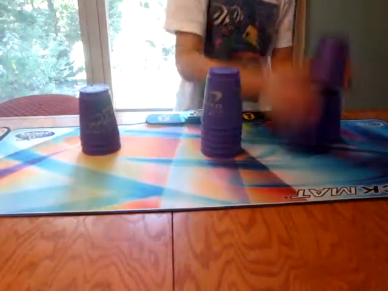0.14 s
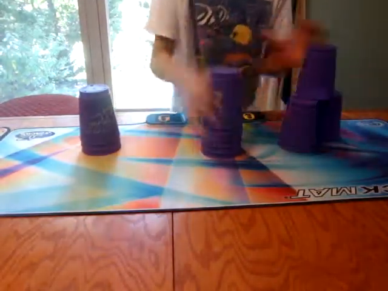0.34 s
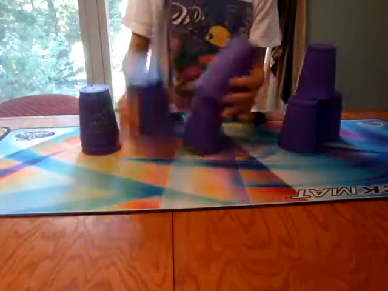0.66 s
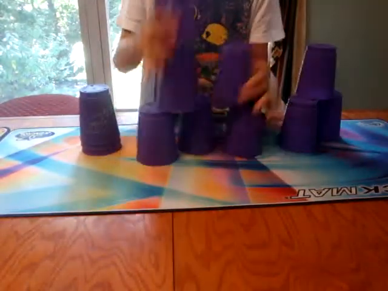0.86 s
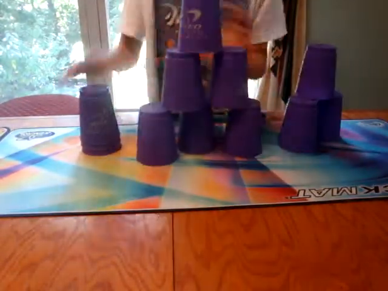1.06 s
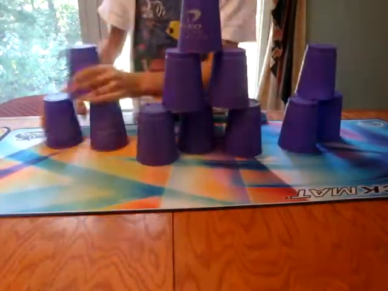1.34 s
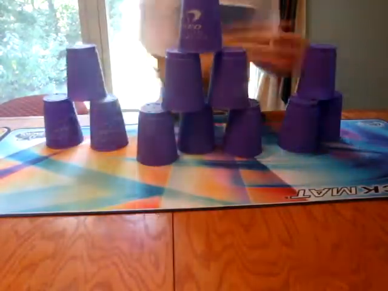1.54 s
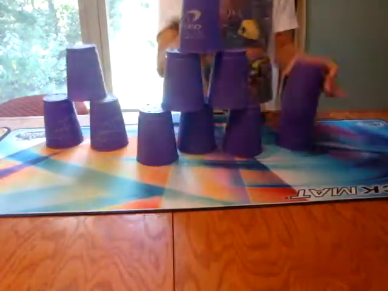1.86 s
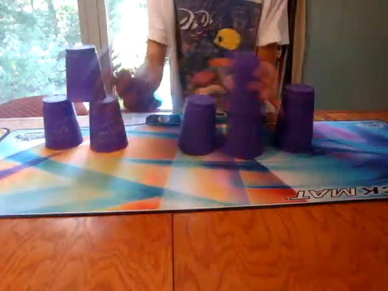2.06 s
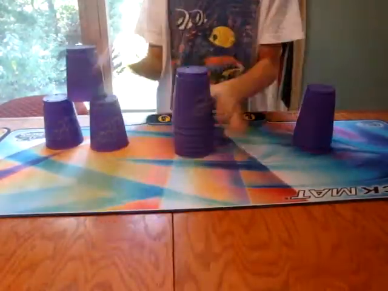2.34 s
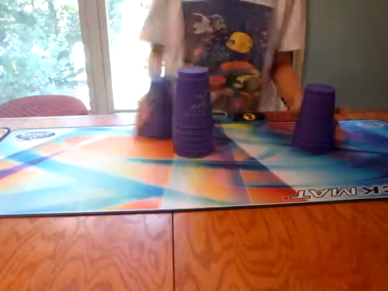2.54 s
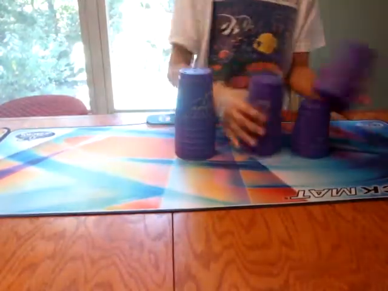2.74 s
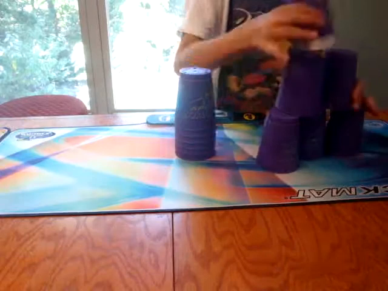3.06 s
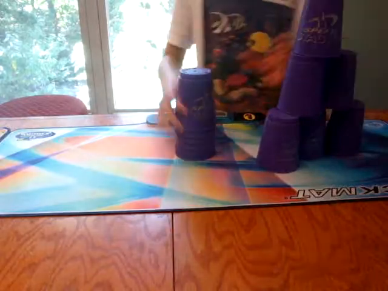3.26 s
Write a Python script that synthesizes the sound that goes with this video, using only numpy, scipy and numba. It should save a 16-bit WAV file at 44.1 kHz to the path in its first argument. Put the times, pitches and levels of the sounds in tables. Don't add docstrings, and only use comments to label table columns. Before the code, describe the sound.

Fast hollow clacking of plastic cups being stacked, nested and restacked in a bare room.

```python
import sys
import numpy as np
from scipy import signal
from scipy.fft import rfft, irfft
from scipy.io import wavfile
from scipy.ndimage import uniform_filter1d, minimum_filter1d
from numba import njit

SR = 44100
rng = np.random.default_rng(int(sys.argv[2]) if len(sys.argv) > 2 else 0)


def convert_level_to_amplitude(level_db):
    exponent = np.asarray(level_db, float) / 20
    return 10 ** exponent


def pcm_store(signal):
    levels = np.round(np.clip(np.atleast_2d(signal), -1, 1) * 32767)
    wavfile.write(sys.argv[1], SR, levels.astype(np.int16).T)


N = 149940

# [t/s, level/dB, cup pitch f/Hz, crack level/dB relative to the knock]
FIRST_STACKS = [(0.034, -20, 535, -23), (0.118, -22, 444, -10.5), (0.218, 8, 779, -18.5),
                (0.231, 7, 573, -16), (0.249, 3, 893, -12), (0.269, 3, 920, -21.5), (0.311, -5, 968, -66),
                (0.368, -10, 906, -23.5), (0.416, -20.5, 960, -6.5), (0.541, -10, 840, -15.5),
                (0.547, -7, 1495, -19.5), (0.66, -26, 700, 3.5), (0.688, -3, 603, -10),
                (0.694, -4.5, 682, -18), (0.719, -4, 873, -31), (0.741, -6, 749, -24),
                (0.806, -13, 601, -19.5), (0.825, -13, 540, -8.5)]
LAST_STACKS = [(0.865, -3.5, 980, -21), (0.914, 4, 871, -16.5), (0.979, -5.5, 872, -6.5),
               (0.987, 4.5, 1026, -31.5), (1.004, -4, 930, -45), (1.039, -11.5, 990, -22),
               (1.244, -5, 1840, -20), (1.365, 0.5, 779, -20), (1.374, -2.5, 1002, -14),
               (1.385, 3, 839, -13), (1.655, -7.5, 847, -20), (1.676, -5.5, 953, -23),
               (1.691, -8, 755, -14)]
NESTING = [(1.791, -9, 946, -8), (1.808, -8, 960, -21.5), (1.827, -10.5, 967, -10),
           (1.852, -10, 886, -10.5), (1.883, -11.5, 905, -8), (1.91, -10, 1056, -10),
           (1.926, -5, 848, -20.5), (1.937, -5.5, 970, -17), (1.948, -11, 997, -4.5),
           (1.969, -10.5, 800, -5), (1.983, 0.5, 1653, -19), (2.002, -8, 1490, -12.5),
           (2.027, 0, 1364, -17), (2.044, -4, 1266, -30), (2.084, -14, 950, -27.5), (2.102, -17, 896, -3),
           (2.13, -17.5, 895, -5), (2.155, 2, 1737, -20.5), (2.212, -16.5, 817, -4.5), (2.224, -15, 643, 0),
           (2.239, -14.5, 660, -6.5), (2.263, -16, 792, -21.5), (2.302, -20, 627, -5),
           (2.312, -4, 2025, -19), (2.381, -11.5, 920, -16), (2.398, -4, 948, -23),
           (2.437, -14, 967, -13.5)]
RESTART = [(2.54, -9, 809, -1), (2.576, -6.5, 1750, -11), (2.589, -5.5, 1185, -20),
           (2.777, -21.5, 573, -27), (2.804, -20, 632, -16.5), (2.84, -9, 786, -16),
           (2.917, -13.5, 620, -14), (2.963, -9.5, 773, -17.5), (2.984, -7.5, 1178, -31.5),
           (3.037, -3.5, 867, -11.5), (3.054, -3, 950, -36.5), (3.099, -4, 833, -11.5),
           (3.136, -10, 844, -32.5)]
# [t/s, level/dB, cup pitch f/Hz, crack level/dB
MORE_KNOCKS = [(.064, -22.5, 820, -36), (0.209, -16, 674, -14), (.527, -16.5, 1945, -18.5),
               (.884, -2, 960, -22.5), (.940, -9.5, 850, -13.5), (1.405, -4, 1005, -29.5),
               (2.186, -13.5, 734, -12), (2.558, -9.5, 1160, -13), (3.019, -13.5, 1013, -28),
               (3.079, -9.5, 965, -17.5), (3.11, -5, 1195, -19)]
# [ratio to cup pitch, level/dB, cycles to fade by 60 dB]
WALL_MODES = [(1, 1, 30), (1.33, -10.5, 30.5), (0.777, -11.5, 22.5)]
# [f/Hz, width/Hz, level/dB, 60 dB fade/s]
CRACK_BANDS = [(962, 1005, -0.5, 0.039), (2284, 1245, 1, 0.028), (3760, 1200, -12, 0.04),
               (5200, 1800, 0.5, 0.01), (7800, 2260, -6.5, 0.012)]
# [f/Hz, level/dB]
STANDING_CUPS = [(560, -7.5), (650, -6), (760, -11.5), (935, -7.5), (985, -9.5), (1192, -8), (1280, -14.5),
                 (1370, -9.5)]
# [t/s, level/dB]
FREEDOM = [
    (0.199, -6.5),
    (.3, -20.5),
    (0.449, -7),
    (.95, -19.5),
    (1.7, -26),
    (2.3, -13.5),
    (3.1, -14.5),
]
# [f/Hz, level/dB, 60 dB fade/s]
TABLE_MODES = [(177.5, -34, 0.05), (338, -35, 0.41), (407, -43.5, 0.42)]
# [f/Hz, level/dB, 60 dB fade/s]
ROOM_BANDS = [(300, -1.5, 0.15), (632, -7, 0.39), (1106, -8, 0.48), (2046, -7.5, 0.43), (4440, -8, 0.42),
              (8000, -12.5, 0.44)]
# [f/Hz, level/dB per Hz]
AIR_COLOUR = [(30, -8.5), (180, -1.5), (500, -1), (1300, -3.5), (10000, -22)]
# [t/s, level/dB, f/Hz]
POPS = [(0.041, -13, 550), (0.245, 6, 677), (0.274, -12, 930), (0.318, -6, 1210), (0.348, -6, 944),
        (0.712, -8, 730), (0.832, -14.5, 564), (0.873, -17, 1010), (0.901, -10, 640), (0.918, -12, 806),
        (0.931, -8, 855), (1.035, -16, 1154), (1.059, -10.5, 930), (1.419, -14, 930), (1.856, -24.5, 1060),
        (1.866, -9, 930), (2.158, -8, 787), (3.129, -6, 950)]
# [t/s, level/dB, f/Hz]
TICKS = [(0.229, -19.5, 2390), (0.239, -23, 2190), (0.245, -3.5, 1960), (0.256, -8, 2240),
         (0.28, -45, 2130), (0.293, -34.5, 1820), (0.709, -14.5, 1715), (0.773, -24, 2490),
         (0.873, -33, 2290), (0.996, -29.5, 1610), (1.252, -20, 1694), (1.259, -17.5, 1740),
         (1.414, -23.5, 2400), (1.649, -23, 2500), (1.696, -16.5, 5220), (1.801, -23, 2540),
         (1.856, -13, 3140), (1.873, -24, 2700), (1.903, -24, 2580), (1.913, -18, 2940),
         (1.963, -17.5, 2370), (1.977, -14.5, 2910), (1.991, -14.5, 1650), (1.998, -26, 1730),
         (2.009, -13.5, 2000), (2.015, -16.5, 1770), (2.049, -35.5, 1550), (2.14, -15, 2810),
         (2.145, -17, 3080), (2.161, -22.5, 1880), (2.174, -24, 1730), (2.204, -30, 2010),
         (2.244, -15.5, 2330), (2.327, -21.5, 2210), (2.376, -37, 2700), (2.406, -9.5, 4930),
         (2.547, -10.5, 2900), (2.567, -18, 2950), (2.584, -15, 1980), (2.607, -27, 1580),
         (2.622, -23.5, 1880), (2.927, -29, 2360)]
# [t/s, level/dB, f/Hz]
MORE_TICKS = [
    (.586, -33.5, 3060),
    (1.756, -34, 3000),
    (3.31, -36, 6120),
    (3.347, -38.5, 934),
    (3.384, -33, 5130),
    (3.38, -35.5, 660),
]
# [t/s, level/dB, f/Hz, 60 dB fade/s]
LONE_RINGS = [(0.225, -10, 187, 0.093), (0.268, -1.5, 921.6, 0.28), (.326, -7, 938, 0.15),
              (.3, -13.5, 1287, 0.23), (0.419, -33.5, 128, 0.29), (0.549, -17, 1181, 0.14),
              (0.868, -9, 1075, 0.27), (.98, -22.5, 949, 0.44), (1.252, -27.5, 1774, 0.14),
              (1.252, -25, 1947, .16), (1.246, -30, 650, 0.067), (1.248, -20.5, 1187, 0.12),
              (3.105, -14, 1091, 0.24)]
# [f/Hz, threshold level/dB relative to the highest level nearby]
THINNING = [(1500, -17), (4500, -14.5), (5500, -12), (10000, -7.5)]


def band(x, hz, width):
    edges = [max(hz - width / 2, 20), hz + width / 2]
    return signal.sosfilt(signal.butter(2, edges, "band", fs=SR, output="sos"), x)


def fade(t, t60):
    return convert_level_to_amplitude(-60 * t / max(t60, .002))


def air():
    level_db, earlier_db, earlier_t60_s = -46, 8, 1
    f = np.arange(N // 2 + 1) * SR / N + 1
    hz, db = np.array(AIR_COLOUR).T
    colour = convert_level_to_amplitude(np.interp(np.log(f), np.log(hz), db))
    x = irfft(rfft(rng.standard_normal(N)) * colour, N)
    earlier = convert_level_to_amplitude(earlier_db) * fade(np.arange(N) / SR, earlier_t60_s)
    return x / x.std() * convert_level_to_amplitude(level_db) * (1 + earlier)


def knock(rows):
    crack_gain_db, spread_db, detune = 14, 5, 0.09
    contact_s, soften = 0.00093, 0.22
    stiff_hz = 1130
    size = 4096
    out, blows, t = np.zeros(N + size), np.zeros(N), np.arange(size) / SR
    crack_env = np.zeros((len(CRACK_BANDS), N + size))
    luck = rng.standard_normal((len(rows), 3, 8))
    fades = np.array([fade(t, t60) for _, _, _, t60 in CRACK_BANDS])
    for (s, db, hz, crack_db), (level_luck, pitch_luck, crack_luck) in zip(rows, luck):
        i = int(s * SR)
        touch = np.minimum(t / contact_s * convert_level_to_amplitude(soften * db), 1)
        for k, (ratio, wall_db, cycles) in enumerate(WALL_MODES):
            loose = min(k, 1)
            level = convert_level_to_amplitude(db + wall_db + spread_db * loose * level_luck[k])
            t60 = cycles / hz * min(1, stiff_hz / hz)
            mode_hz = hz * ratio * (1 + detune * loose * pitch_luck[k])
            out[i:i + size] += level * fade(t, t60) * touch * np.sin(2 * np.pi * mode_hz * t)
        level = convert_level_to_amplitude(db + crack_db + crack_gain_db + 2 * crack_luck[:len(CRACK_BANDS), None])
        crack_env[:, i:i + size] += level * fades * np.sqrt(touch)
        blows[i:i + 24] += convert_level_to_amplitude(db) * np.hanning(24) / 12
    for env, (hz, width, db, _) in zip(crack_env, CRACK_BANDS):
        out += convert_level_to_amplitude(db) * band(env * rng.standard_normal(len(env)), hz, width)
    return out[:N], blows


@njit
def ring(x, hz, t60):
    y, z, r = np.empty(len(x)), 0j, np.exp(-np.log(1000.) / t60 / SR)
    for i in range(len(x)):
        if i % 64 == 0:
            p = r * np.exp(2j * np.pi * hz[i] / SR)
        z = z * p + x[i] + 1e-18
        y[i] = z.imag
    return y


def wander(hz, share):
    steps = np.repeat(rng.standard_normal(N // 32 + 1), 32)
    return hz * (1 + share * 6 * uniform_filter1d(steps, size=1200)[:N])


def standing_cups(blows):
    t60_s, wobble = 0.22, 0.014
    shaken = blows * convert_level_to_amplitude(np.interp(np.arange(N) / SR, *np.array(FREEDOM).T))
    return sum(convert_level_to_amplitude(db) * ring(shaken, wander(hz, wobble), t60_s) for hz, db in STANDING_CUPS)


def table_top(blows):
    thump = (60, -38, 0.1)  # f/Hz, level/dB, 60 dB fade/s
    modes = list(TABLE_MODES) + [thump]
    return sum(convert_level_to_amplitude(db) * ring(blows, np.full(N, 1. * hz), 1. * t60) for hz, db, t60 in modes)


def rattle(rows):
    bounces, lag_s, sag_db_s = 5, 0.022, 121
    gain_db, scatter_db, hiss_db = -21, 6, 8
    middle_hz, octaves, t60_s = 1338, 1.066, 0.021
    r = rng.random((len(rows), bounces, 3))
    out, t = np.zeros(2 * N), np.arange(1024) / SR
    env, hiss = fade(t, t60_s), band(rng.standard_normal(2 * N), 4580, 3900)
    for (s, db, _, crack_db), row in zip(rows, r):
        for chance, size, pitch in row:
            lag = -lag_s * np.log(chance)
            i = int((s + lag) * SR)
            hz = middle_hz * 2 ** (octaves * (2 * pitch - 1))
            level_db = db + crack_db / 2 + gain_db + scatter_db * 2 * size - sag_db_s * lag
            scrape = convert_level_to_amplitude(crack_db / 2 + hiss_db) * hiss[i:i + 1024]
            out[i:i + 1024] += convert_level_to_amplitude(level_db) * env * (np.sin(2 * np.pi * hz * t) + scrape)
    return out[:N]


def room(x):
    echo_s, build_s = 0.0025, 0.0072
    t = np.arange(30000) / SR
    build = np.clip((t - echo_s) / build_s, 0, 1)
    tail = 0
    for hz, db, t60 in ROOM_BANDS:
        part = band(rng.standard_normal(30000), hz, 0.8 * hz) * fade(t, t60) * build
        tail = tail + convert_level_to_amplitude(db) * part / np.sqrt(t60 * SR / 14)
    return signal.fftconvolve(x, tail)[:N]


def small_rings(rows, gain_db, rise_s, cycles, hiss_db):
    hiss_t60_s = 0.0095
    out, t = np.zeros(2 * N), np.arange(2048) / SR
    hiss = band(rng.standard_normal(2 * N), 4000, 8700)
    luck = rng.standard_normal((len(rows), 2))
    for (s, db, hz), (a, b) in zip(rows, luck):
        i = int(s * SR)
        second = np.sin(2 * np.pi * hz * (1.2 + 0.098 * a) * t + b)
        tone = (np.sin(2 * np.pi * hz * t) + 0.43 * second) * fade(t, cycles / hz)
        scrape = convert_level_to_amplitude(hiss_db) * hiss[i:i + 2048] * fade(t, hiss_t60_s)
        out[i:i + 2048] += convert_level_to_amplitude(db + gain_db) * np.minimum(t / rise_s, 1) * (tone + scrape)
    return out[:N]


def lone_rings():
    beat, twin_db, swell_s = 0.024, -8.5, 0.0014
    size = 20000
    out, t = np.zeros(N + size), np.arange(size) / SR
    swell = np.minimum(t / swell_s, 1)
    for s, db, hz, t60 in LONE_RINGS:
        i = int(s * SR)
        twin = convert_level_to_amplitude(twin_db) * np.sin(2 * np.pi * hz * (1 + beat) * t)
        out[i:i + size] += convert_level_to_amplitude(db) * fade(t, t60) * swell * (np.sin(2 * np.pi * hz * t) + twin)
    return out[:N]


def scene():
    room_tone = air()
    rows = [row for burst in (FIRST_STACKS, LAST_STACKS, NESTING, RESTART, MORE_KNOCKS) for row in burst]
    cups, blows = knock(rows)
    dry = convert_level_to_amplitude(-3) * (cups + standing_cups(blows) + table_top(blows) + lone_rings())
    dry = dry + rattle(rows)
    dry = dry + small_rings(POPS, gain_db=3.5, rise_s=0.0026, cycles=17, hiss_db=-28)
    rims = list(TICKS) + list(MORE_TICKS)
    dry = dry + small_rings(rims, gain_db=5, rise_s=0.00081, cycles=23, hiss_db=-7)
    return (dry + room(dry) + room_tone)[None]


@njit
def follow(x, fall):
    y, e = np.empty(len(x)), 0.
    for i in range(len(x)):
        e = max(x[i], e * fall)
        y[i] = e
    return y


def limiter(x):
    limit_db, release_s = -3.5, 0.011
    peak = follow(np.abs(np.roll(x, -20)), np.exp(-1 / (release_s * SR)))
    return x * uniform_filter1d(np.minimum(1, convert_level_to_amplitude(limit_db) / (peak + 1e-9)), size=20)


def thin_treble(x):
    ahead_s, patchy_db = 0.022, 5.5
    n = int(ahead_s * SR)
    f, spec = np.arange(N // 2 + 1) * SR / N, rfft(x)
    edges = np.geomspace(1500, 10500, 15)
    for lo, hi in zip(edges, edges[1:]):
        part = irfft(spec * ((f >= lo) & (f < hi)), N)
        env = np.sqrt(np.abs(uniform_filter1d(part ** 2, size=256)))
        shifted = np.r_[env[n // 4:], env[-(n // 4):]]
        ahead = -minimum_filter1d(-shifted, size=n + n // 2)
        patches = np.repeat(rng.standard_normal(N // 384 + 1), 384)[:N]
        patch_db = patchy_db * np.clip((lo - 2600) / 3100, 0, 1) * patches
        threshold = convert_level_to_amplitude(np.interp(lo, *np.array(THINNING).T) + patch_db) * ahead
        x = x - part * uniform_filter1d(1. * (env < threshold), size=100)
    return x


def top_cut(x):
    return signal.sosfilt(signal.butter(12, 16300, fs=SR, output="sos"), x)


def record(dry):
    low_cut_hz, top_hz = 188, 10150
    x = signal.sosfilt(signal.butter(2, low_cut_hz, "high", fs=SR, output="sos"), dry[0])
    x = thin_treble(limiter(x))
    x = signal.sosfilt(signal.ellip(10, .2, 80, top_hz, fs=SR, output="sos"), x)
    return top_cut(np.clip(x, -.7, .7)[None])


dry = scene()
out = record(dry)
pcm_store(out)
```